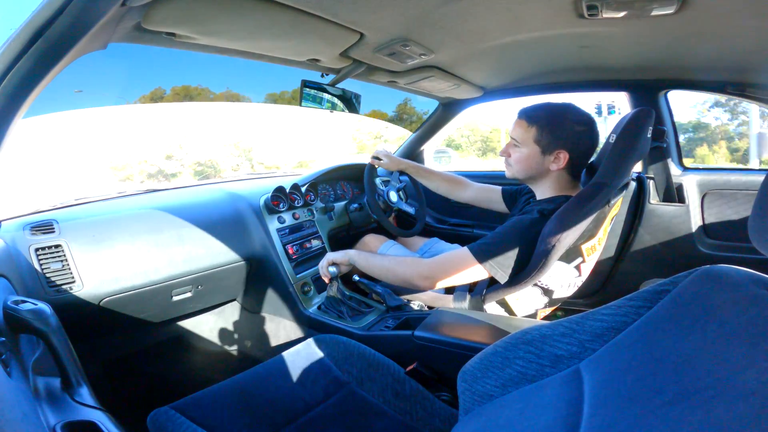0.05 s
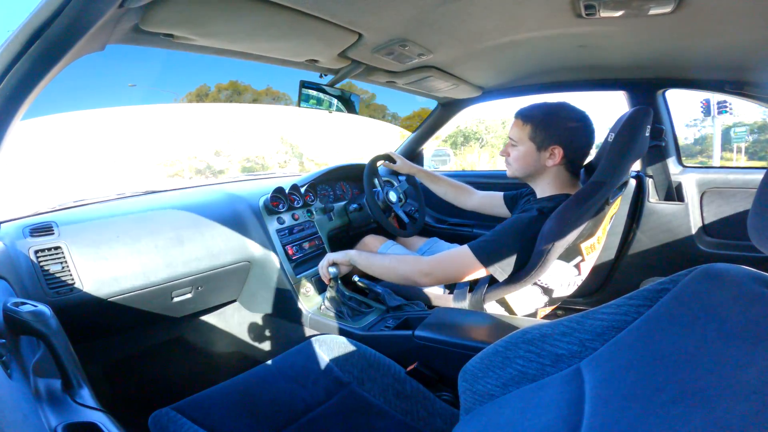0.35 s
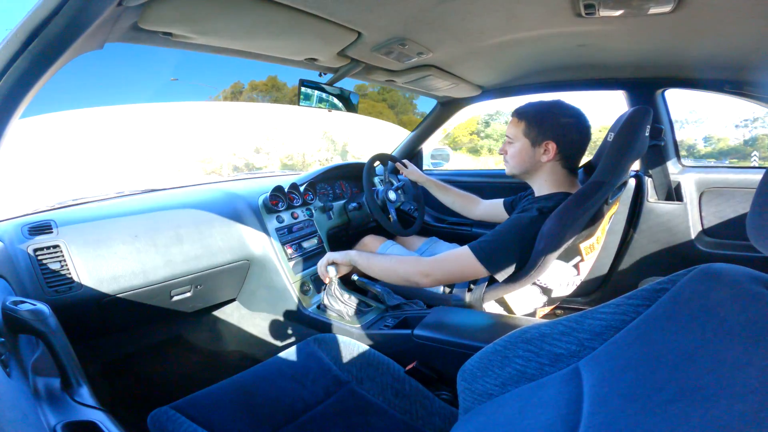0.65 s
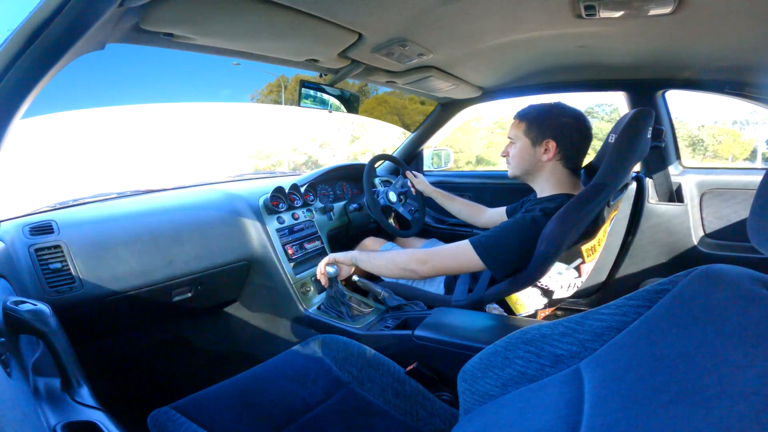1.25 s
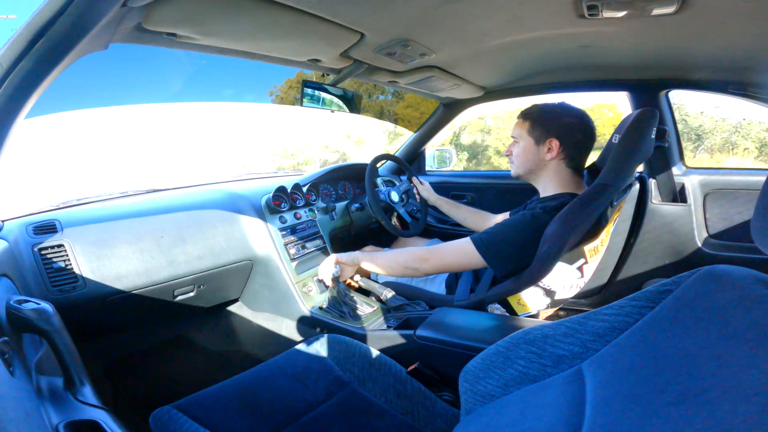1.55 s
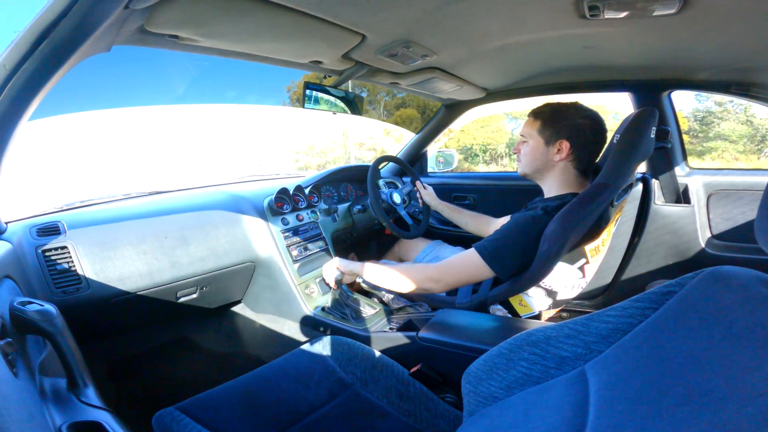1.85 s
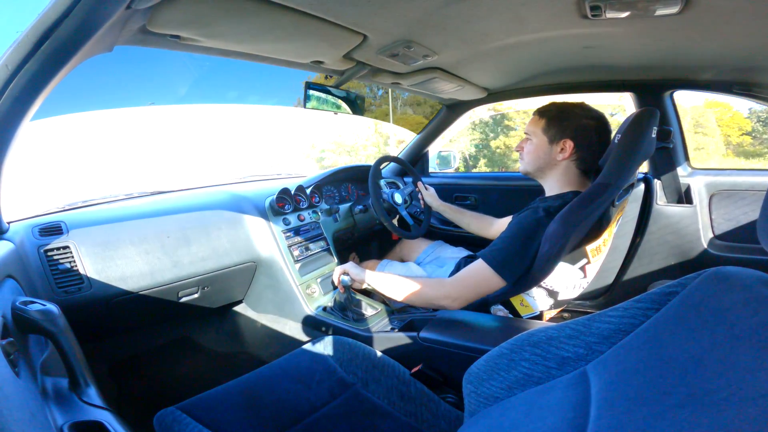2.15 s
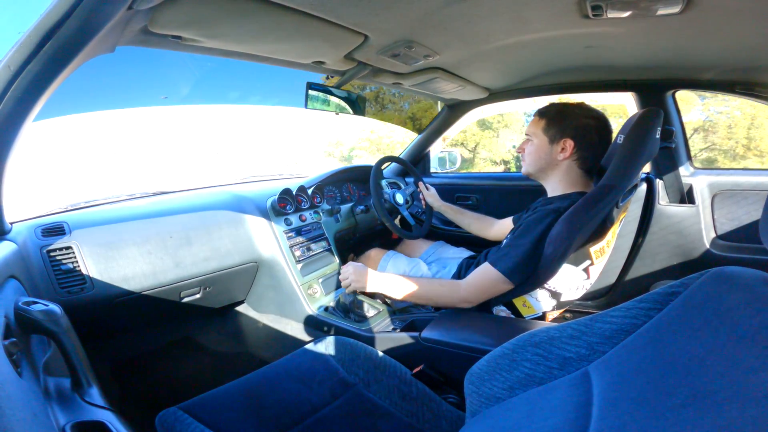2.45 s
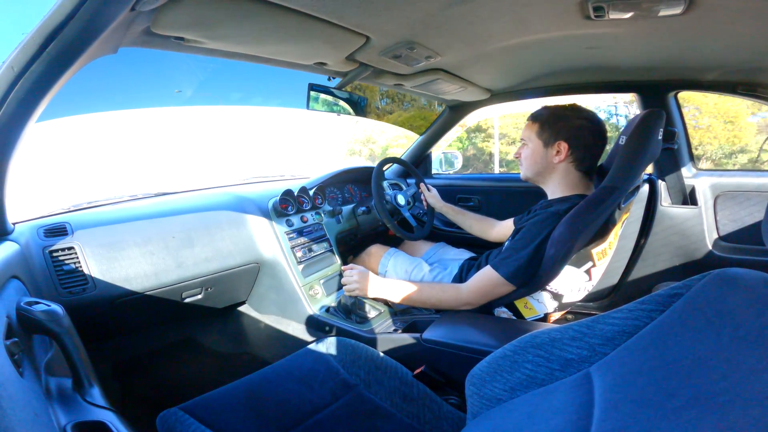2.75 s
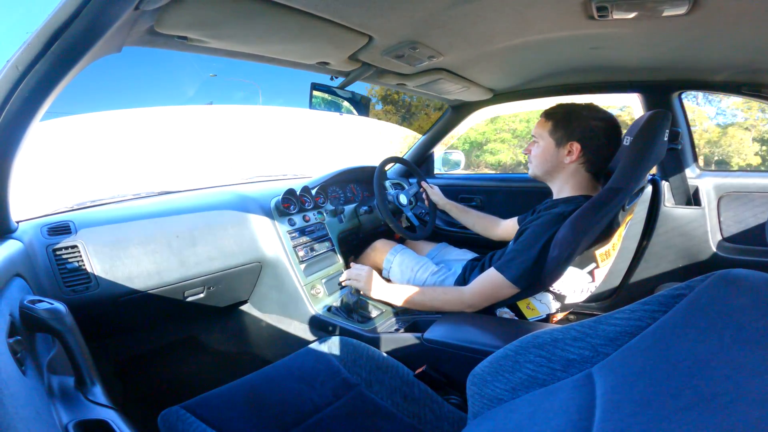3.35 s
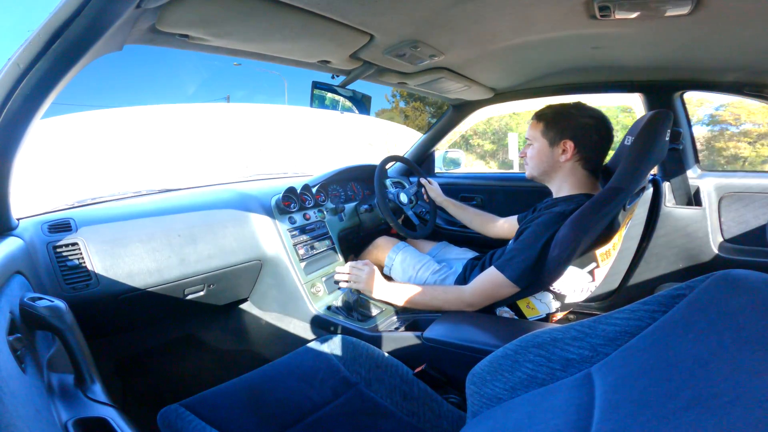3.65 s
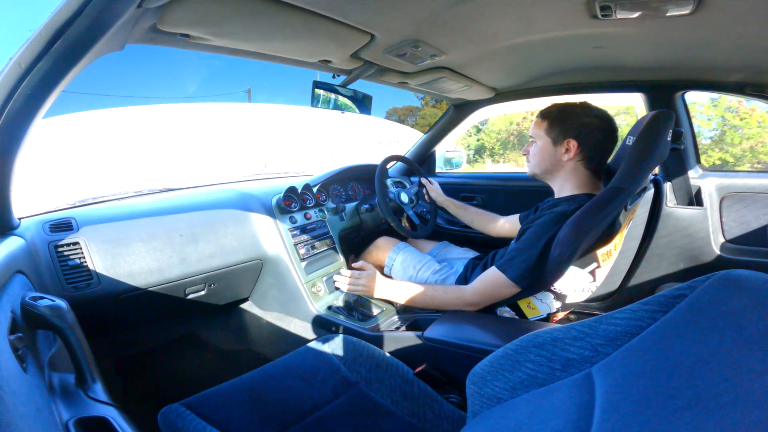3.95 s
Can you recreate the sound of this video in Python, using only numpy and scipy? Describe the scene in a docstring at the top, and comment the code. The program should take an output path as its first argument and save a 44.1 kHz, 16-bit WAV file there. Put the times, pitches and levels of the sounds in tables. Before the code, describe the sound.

A car engine drones and rises through one gear, heard from behind the front seats with low tyre rumble. After a short rattle, the turbo flutters and hoots, fading as the revs drop, before acceleration resumes in the next gear.

```python
"""Inside a turbocharged six-cylinder car, a pair of microphones behind the front seats.
The engine pulls up through one gear over road rumble, drive-line boom and accessory whine; at 1.3 s
something loose rattles. At 1.7 s the throttle closes for the shift: the compressor surges in a slowing
flutter of puffs over a sinking hoot, and the engine burbles as the revs fall.
From 2.7 s it pulls again in the next gear."""
import sys
import numpy as np
from scipy import signal
from scipy.fft import rfft, irfft
from scipy.io import wavfile
from scipy.ndimage import uniform_filter1d, minimum_filter1d

SR = 44100
rng = np.random.default_rng(int(sys.argv[2]) if len(sys.argv) > 2 else 0)


def log_audio(samples):
    """Write samples as a 16-bit WAV file to the path given in sys.argv[1]."""
    # one column per channel
    frames = np.atleast_2d(samples).T
    # limit to full scale, then quantise
    limited = np.clip(frames, -1, 1)
    pcm = np.round(limited * 32767).astype(np.int16)
    wavfile.write(sys.argv[1], SR, pcm)


N = 176400
TIME = np.arange(N) / SR


# Crank speed: time_s, speed_rpm
CRANK_SPEED = [(0.0, 3212), (0.25, 3376), (0.5, 3615), (0.75, 3876), (1.0, 4140), (1.25, 4458), (1.5, 4847),
               (1.68, 5048), (1.85, 4600), (2.0, 4274), (2.25, 3804), (2.5, 3308), (2.7, 2910), (2.9, 3289),
               (3.02, 3057), (3.25, 3262), (3.5, 3416), (4.0, 3842)]
# Strongest engine notes: order (multiple of the four-stroke cycle rate; 6 is the firing rate)
DRONE_ORDERS = (6, 9, 12, 18)
# Their balance in the cabin: time_s, order6_db, order9_db, order12_db, order18_db
DRONE_LEVELS = [(0, -23, -34.5, -33.5, -50.5), (0.3, -22, -37, -31, -36), (0.6, -24, -31, -25, -44),
                (0.8, -25, -33, -55.5, -48), (1.2, -27, -34, -39.5, -49), (1.6, -30, -35.5, -59, -51.5),
                (1.73, -35, -26, -32, -56.5), (1.83, -21, -34, -29, -61), (2.1, -29.5, -31, -51, -44),
                (2.5, -29, -31.5, -53, -63.5), (2.75, -32.5, -55, -38, -58), (2.95, -24.5, -43, -29.5, -65),
                (3.1, -27, -43, -28, -48), (3.35, -18.5, -42.5, -27.5, -45), (3.6, -15, -25, -22.5, -42.5),
                (3.8, -17.5, -30.5, -19, -35.5), (4, -16.5, -28, -32, -34.5)]
# Weaker notes from unequal cylinders: order
UNEVEN_ORDERS = (2, 3, 4, 5, 7, 8, 10, 11, 13, 14, 15, 16, 17, 19, 20, 21, 24, 39)
# One base level for each: level_db
UNEVEN_LEVELS = [-34, -30.5, -32.5, -35.5, -40, -40.5, -44, -52.5, -46, -49, -50.5, -56, -58, -52, -62,
                 -53.5, -61, -61]
# Their shared rise and fall: time_s, gain_db
UNEVEN_GAIN = [(0, -8), (.4, -6), (.9, -1), (1.3, 1.5), (1.65, 4), (1.95, 0), (2.4, -9), (2.8, -0.5),
               (3.2, -4), (4, -2)]

def engine(crank_hz, drone_trim_db=-1, burble_depth=0.4):
    """Firing notes and weaker ones between; with the throttle shut, uneven firing makes them burble."""
    cycle_hz, notes = crank_hz / 2, np.zeros(N)
    for column, order in enumerate(DRONE_ORDERS, start=1):
        level_db = drone_trim_db + curve(DRONE_LEVELS, column) + 1.5 * wander(hz=14)
        notes += amp(level_db) * tone(order * cycle_hz)
    uneven_db = curve(UNEVEN_GAIN)
    for order, base_db in zip(UNEVEN_ORDERS, UNEVEN_LEVELS):
        notes += amp(base_db + uneven_db + 3.5 * wander(hz=8.7)) * tone(order * cycle_hz)
    overrun = swell(at_s=2.3, width_s=0.54)
    return notes * (1 + burble_depth * overrun * wander(hz=34.4))


# Rough gulps as the compressor first stalls: peak_s, width_s, pitch_hz, level_db
GULPS = [(1.694, 0.021, 610, -29), (1.723, 0.023, 967, -32.5)]

def compressor_stall(sag_per_s=1.5):
    """The compressor gulps with a sagging pitch, and trapped boost spills back in a whoosh."""
    gulps = np.zeros(N)
    for peak_s, width_s, pitch_hz, level_db in GULPS:
        sagging_hz = pitch_hz * np.exp(-sag_per_s * np.clip(TIME - peak_s, -.5, .5))
        rough_note = unit(tone(sagging_hz) + noise_band(sagging_hz, width_hz=200))
        gulps += amp(level_db) * swell(peak_s, width_s) * rough_note
    spill = noise_band(np.full(N, 400), width_hz=140)
    return gulps + amp(-28.5) * swell(at_s=1.78, width_s=0.077) * spill


# Surge puffs, heard from inside the car: peak_s, hiss_db, hoot_db
PUFFS = [(1.707, -42, -25), (1.798, -41, -31), (1.901, -43.5, -40), (1.995, -45, -37.5),
         (2.081, -45.5, -26.5), (2.167, -47, -23.5), (2.248, -48.5, -23.5), (2.332, -45.5, -31.5),
         (2.409, -52, -28), (2.486, -51.5, -35), (2.558, -51.5, -42.5), (2.63, -56, -34),
         (2.70, -58.5, -42.5)]
# Colour of a puff: frequency_hz, density_db
PUFF_COLOUR = [(400, 2.5), (1000, -1), (1800, 3), (2800, -1), (4000, -1.5), (5200, -5.5), (6200, -9.5),
               (7500, -9.5), (9800, -19.5), (11000, -22.5), (16000, -31)]
# The hoot sinks as the compressor slows: time_s, pitch_hz
HOOT_PITCH = [(1.7, 488), (1.85, 440), (2.0, 369.8), (2.15, 294.1), (2.3, 271.6), (2.5, 239.4),
              (2.75, 215.9)]

def compressor_surge(hoot_lag_s=0.038, shrink_per_s=0.67):
    """Each surge spits air back through the compressor, then the intake pipe hoots."""
    air, pipe = np.zeros((2, N))
    turbulence = amp(wander(hz=90))
    for peak_s, hiss_db, hoot_db in PUFFS:
        shrink = np.exp(-shrink_per_s * (peak_s - PUFFS[0][0]))
        air += amp(hiss_db) * swell(peak_s, width_s=0.033 * shrink) * turbulence
        pipe += amp(hoot_db) * swell(peak_s + hoot_lag_s, width_s=0.021 * shrink)
    return air * noise(PUFF_COLOUR) + pipe * noise_band(curve(HOOT_PITCH), width_hz=55)


# Mechanical roar from up front: frequency_hz, density_db
ROAR_COLOUR = [(100, -4), (300, 4.5), (520, 2.5), (800, -5), (1150, -2.5), (1500, -9.5), (2050, -13.5),
               (2600, -11), (3300, -17.5), (4200, -23), (5500, -27), (8000, -47), (11000, -52),
               (16000, -67.5)]
# Its level in the cabin: time_s, level_db
ROAR_LEVEL = [(0, -41), (.6, -36.5), (1.2, -35.5), (1.48, -34.5), (1.68, -31), (1.9, -34.5), (2.2, -38),
              (2.5, -40.5), (2.72, -42), (2.83, -42), (2.92, -39.5), (3.4, -37.5), (4, -34)]
# Air rushing through the intake: frequency_hz, density_db
INTAKE_COLOUR = [(600, -23), (1700, 0), (2800, 2.5), (4000, -2), (5400, -7.5), (6200, -9), (7500, -9),
                 (9500, -21.5), (11000, -27.5), (16000, -34.5)]
# Its level in the cabin: time_s, level_db
INTAKE_LEVEL = [(0, -57), (.6, -57), (1.15, -50.5), (1.5, -49.5), (1.645, -43.5), (1.75, -49), (2, -57),
                (2.4, -58), (2.6, -59.5), (2.72, -69), (2.83, -62), (2.9, -60), (3.1, -56.5), (3.6, -49),
                (4, -46)]

def engine_roar(crank_hz):
    """Mechanical noise and intake air throb slightly with each firing and each four-stroke cycle."""
    firing, cycle = tone(3 * crank_hz), tone(crank_hz / 2)
    throb = unit(1 + 0.0176 * firing + 0.033 * cycle)
    machinery = amp(curve(ROAR_LEVEL) + 0.47 * wander(hz=13)) * noise(ROAR_COLOUR)
    intake = amp(curve(INTAKE_LEVEL)) * noise(INTAKE_COLOUR)
    return throb * (machinery + intake)


# Drive-line boom in the cabin: time_s, pitch_hz, fundamental_db, octave_db
BOOM = [(0, 31.84, -22.5, -41.5), (.4, 36.06, -19, -44.5), (.8, 41.53, -17.5, -35),
        (1.25, 45.52, -18, -37.5), (1.6, 51.9, -23.5, -37.5), (2.1, 49.95, -29, -38.5),
        (2.4, 44.75, -20, -28.5), (2.7, 46, -16, -37), (3, 48.45, -33, -45), (4, 50.05, -34, -43.5)]

def drive_line():
    """The drive line booms on a deep, wavering note and its octave."""
    pitch_hz = curve(BOOM)
    boom = amp(curve(BOOM, column=2)) * tone(pitch_hz) + amp(curve(BOOM, column=3)) * tone(2 * pitch_hz)
    return amp(1.5 * wander(hz=15)) * boom


# Road rumble all around the microphones: frequency_hz, density_db
ROAD_COLOUR = [(8, -22), (18, -4.5), (30, 3.5), (45, -12.5), (62, -12), (100, -12), (150, -18.5),
               (250, -19), (400, -27), (600, -34.5), (1000, -43.5), (3000, -92.5)]
# Its rise and fall: time_s, level_db
ROAD_LEVEL = [(0, -16.5), (.6, -22.5), (1.3, -24), (1.8, -16.5), (2.2, -18.5), (2.55, -18.5), (3, -21.5),
              (3.25, -18), (3.55, -20.5), (3.8, -16), (4, -15.5)]

def road():
    """Tyres and body rumble over the road."""
    return amp(curve(ROAD_LEVEL)) * noise(ROAD_COLOUR)


# Something loose in the cabin: start_s, level_db, ring_hz
RATTLE = [(1.3046, -30.5, 4270), (1.3095, -33, 3440), (1.314, -31.5, 3510), (1.3244, -27, 6530),
          (1.329, -30.5, 6700), (1.335, -30, 1930), (1.3401, -30.5, 8870), (1.344, -41, 8300),
          (1.347, -40.5, 9600), (1.366, -48, 3400)]
# Faint ticks of the trim: start_s, level_db, ring_hz
TRIM_TICKS = [(0.039, -53, 6600), (0.231, -59, 4500), (.345, -54, 6950), (.537, -56, 4500),
              (.655, -57, 9000), (.965, -52, 7000), (3.05, -58.5, 6935), (3.5, -47, 7000),
              (3.91, -52, 8987)]
# Colour of their cracks: frequency_hz, density_db
CLICK_COLOUR = [(500, -9.5), (1200, 3), (1900, 0.5), (2400, 3.5), (3400, -1), (4300, -1), (5200, -7.5),
                (6500, -1), (7700, -2.5), (9100, -5), (11000, -16.5), (16000, -22.5)]

def rattle(rise_s=.0004, crack_s=.004, ring_s=.003, tail_s=.016, gain_db=1):
    """Loose parts click dryly: a crack, a very short ring and a trace of cabin tail."""
    crack_power, ring = np.zeros(N), np.zeros((2, N))
    for start_s, level_db, ring_hz in RATTLE + TRIM_TICKS:
        age = np.maximum(TIME - start_s, 0)
        onset = amp(level_db) * (1 - np.exp(-age / rise_s))
        decay = np.exp(-age / crack_s) + amp(-26) * np.exp(-age / tail_s)
        crack_power += (onset * decay) ** 2
        ring += onset * np.exp(-age / ring_s) * np.sin(2 * np.pi * (ring_hz * age + rng.random((2, 1))))
    return amp(gain_db) * (np.sqrt(crack_power) * noise(CLICK_COLOUR) + ring)


# Panels around the cabin: peak_s, width_s, crank_multiple, level_db
PANELS = [(0.31, 0.16, 19.4, -43.5), (2.03, 0.093, 13.5, -42), (3.248, 0.1, 15.6, -44.5),
          (3.722, 0.14, 15.6, -40.5)]

def singing_panels(crank_hz):
    """Panels sing briefly as the revs pass."""
    return sum(amp(level_db) * swell(peak_s, width_s) * whine(multiple * crank_hz, width_hz=56)
               for peak_s, width_s, multiple, level_db in PANELS)


# Thin whine from the engine bay: time_s, fundamental_db, octave_db
ACCESSORY_LEVELS = [(0, -54.5, -62), (.5, -58, -63), (.7, -61, -55), (.88, -73, -61.5), (.98, -49.5, -50),
                    (1.12, -50, -54), (1.24, -58, -60), (1.6, -58.5, -70), (2.45, -61.5, -72),
                    (2.68, -47.5, -69.5), (2.85, -56, -73), (3.05, -56.5, -68), (3.3, -46.5, -55),
                    (3.6, -54.5, -52.5), (4, -57, -54.5)]

def accessories(crank_hz, cycles_per_turn=23.15, width_hz=70, fall_db=11.5):
    """Belt-driven accessories whine with the revs; harmonics above the octave fall away."""
    pitch_hz = cycles_per_turn * crank_hz
    overtones = sum(amp(-fall_db * (k - 2)) * whine(k * pitch_hz, k * width_hz) for k in (2, 3, 4))
    fundamental = amp(curve(ACCESSORY_LEVELS)) * whine(pitch_hz, width_hz)
    return fundamental + amp(curve(ACCESSORY_LEVELS, column=2)) * overtones


# Upper band of the turbo whistle, far in the background: peak_s, pitch_hz, rise_hz_per_s, level_db
WHISTLES = [(.94, 10000, 3100, -74), (3.4, 8300, 4100, -78.5), (3.36, 9600, 5000, -74.5),
            (1.2, 6600, 2700, -73)]

def turbo_whistle(width_hz=650, lower_ratio=0.61):
    """As boost builds the turbo whistles in two rising bands, the lower one louder."""
    whistle = np.zeros(N)
    for peak_s, pitch_hz, rise_hz_per_s, level_db in WHISTLES:
        rising_hz = pitch_hz + rise_hz_per_s * (TIME - peak_s)
        lower = amp(4.5) * noise_band(lower_ratio * rising_hz, width_hz)
        upper = noise_band(rising_hz, width_hz)
        whistle += amp(level_db) * swell(peak_s, width_s=.15) * (upper + lower)
    return whistle


def cabin(direct, echo_db=-11, gap_s=.003, decay_s=.014):
    """Glass and trim close to the microphones reflect, lightly combing the middle and treble."""
    t = np.arange(round(.06 * SR)) / SR
    echoes = rng.standard_normal((2, len(t))) * np.exp(-t / decay_s) * (t > gap_s)
    echoes /= np.linalg.norm(echoes, axis=1, keepdims=True)
    echoes = signal.sosfilt(signal.butter(2, 900, "highpass", fs=SR, output="sos"), echoes)
    return direct + amp(echo_db) * signal.fftconvolve(direct, echoes, axes=1)[:, :N]


# How alike the two microphones hear noise: frequency_hz, correlation
MIC_LIKENESS = [(30, .988), (120, .98), (300, .99), (500, .94), (1000, .64), (2000, .66), (4000, .27),
                (8000, -.1), (14000, -.25)]

def noise(colour):
    """Coloured noise of rms one across the pair, alike in the bass and diffuse in the treble."""
    hz = np.fft.rfftfreq(N, 1 / SR)
    left, independent = rfft(rng.standard_normal((2, N)))
    likeness = spectrum(MIC_LIKENESS, hz)
    right = likeness * left + np.sqrt(1 - likeness ** 2) * independent
    return unit(irfft(np.array([left, right]) * amp(spectrum(colour, hz)), N))


def amp(db):
    """Decibels to gain."""
    return 10 ** (np.asarray(db) / 20)


def unit(x):
    """Scales to an rms of one."""
    return x / np.sqrt(np.mean(abs(x) ** 2) + 1e-20)


def curve(table, column=1):
    """One column of a time table, for every sample."""
    table = np.array(table)
    return np.interp(TIME, table[:, 0], table[:, column])


def spectrum(table, hz):
    """Reads a frequency table on a log axis."""
    table_hz, value = np.transpose(table)
    return np.interp(np.log(hz + 1), np.log(table_hz + 1), value)


def wander(hz):
    """Random drift of rms one, up to the given rate."""
    f = np.fft.rfftfreq(N, 1 / SR)
    return unit(irfft(rfft(rng.standard_normal(N)) / (1 + (f / hz) ** 4), N))


def swell(at_s, width_s):
    """A smooth rise and fall about one moment."""
    return np.exp(-((TIME - at_s) / width_s) ** 2)


def phase(hz):
    """Running phase of a pitch curve."""
    return 2 * np.pi * np.cumsum(hz) / SR


def tone(hz):
    """A sine of rms one that follows a pitch curve."""
    return np.sqrt(2) * np.sin(phase(hz) + 2 * np.pi * rng.random())


def noise_band(hz, width_hz):
    """A narrow band of noise that follows a pitch curve."""
    return wander(width_hz / 2) * np.cos(phase(hz)) + wander(width_hz / 2) * np.sin(phase(hz))


def whine(hz, width_hz, noise_share=.35):
    """A tone with a noisy fringe."""
    return np.sqrt(1 - noise_share) * tone(hz) + np.sqrt(noise_share) * noise_band(hz, width_hz)


def limiter(x, ceiling_db=-6, window_s=0.036):
    """Turns the level down smoothly around the highest peaks."""
    window = round(window_s * SR)
    gain = np.minimum(amp(ceiling_db) / (abs(x).max(axis=0) + 1e-9), 1)
    return x * uniform_filter1d(minimum_filter1d(gain, window), window)


def scene():
    """All sources as heard from behind the front seats."""
    crank_hz = curve(CRANK_SPEED) / 60 * (1 + .002 * wander(hz=10.1))
    motor = engine(crank_hz) + engine_roar(crank_hz)
    flutter = compressor_stall() + compressor_surge()
    body = drive_line() + road() + rattle()
    whines = singing_panels(crank_hz) + accessories(crank_hz) + turbo_whistle()
    return cabin(motor + flutter + body + whines)


# Balance of the microphone pair: frequency_hz, left_minus_right_db
MIC_BALANCE = [(60, 1), (99, -2.5), (160, 3), (270, 1), (450, 3.5), (740, 3.5), (1220, 1.5), (2010, 4.5),
               (3330, 4.0), (5500, 0.5), (9080, 4.5), (15000, -3)]

def record(dry, left_lag_s=.00002, fade_s=.006, top_hz=15700):
    """Limited peaks, soft ends, a band limit; the left microphone is mostly louder and a touch later."""
    hz = np.fft.rfftfreq(N, 1 / SR)
    lean_db = spectrum(MIC_BALANCE, hz)
    left = amp(lean_db / 2) * np.exp(-2j * np.pi * hz * left_lag_s)
    microphones = np.array([left, amp(-lean_db / 2)]) / (1 + (hz / top_hz) ** 120)
    from_end_s = np.minimum(TIME, TIME[::-1])
    fades = np.sin(np.pi / 2 * np.minimum(from_end_s / fade_s, 1)) ** 2
    return irfft(rfft(limiter(dry) * fades) * microphones, N)


dry = scene()
out = record(dry)
log_audio(out)
```